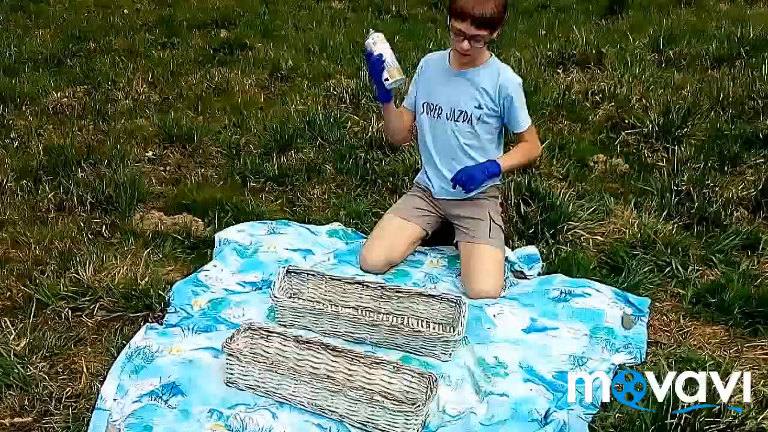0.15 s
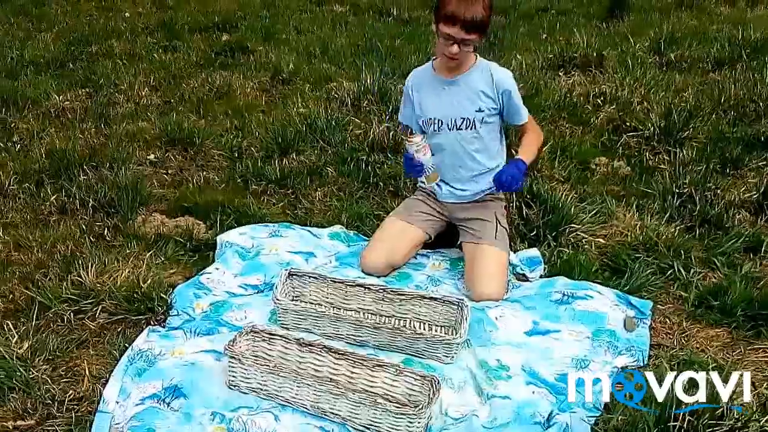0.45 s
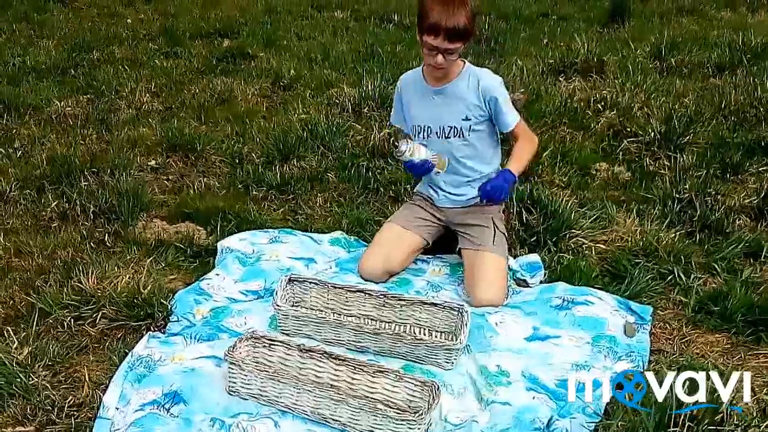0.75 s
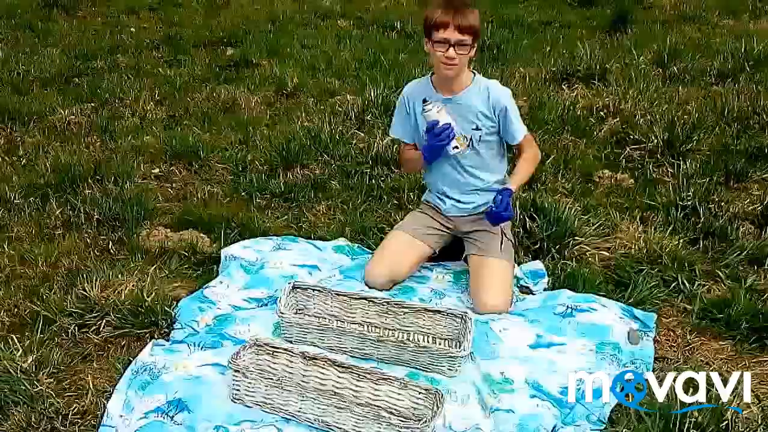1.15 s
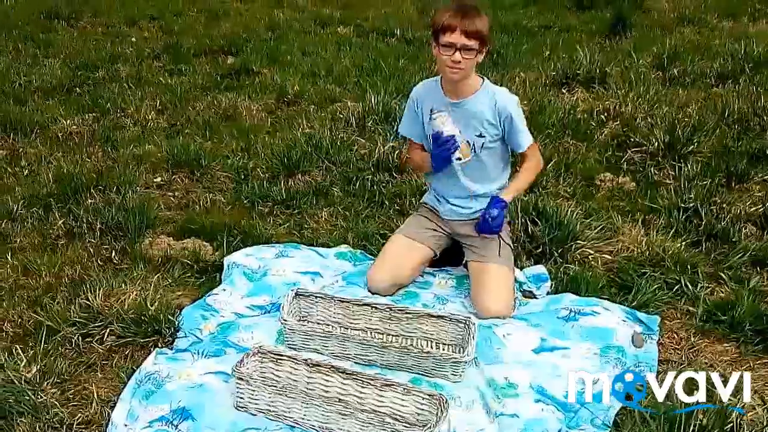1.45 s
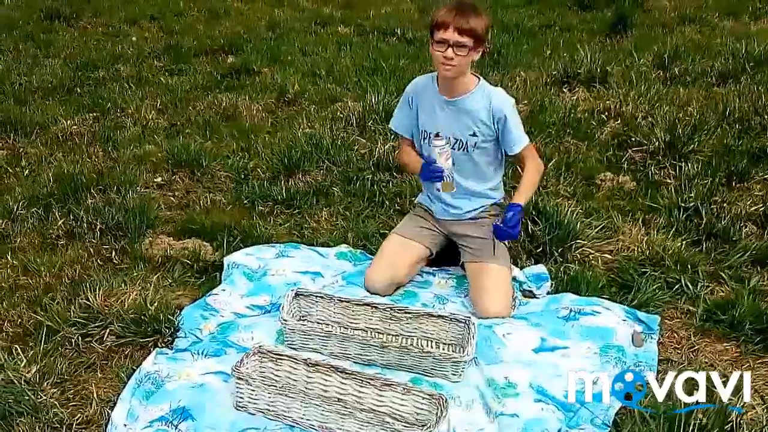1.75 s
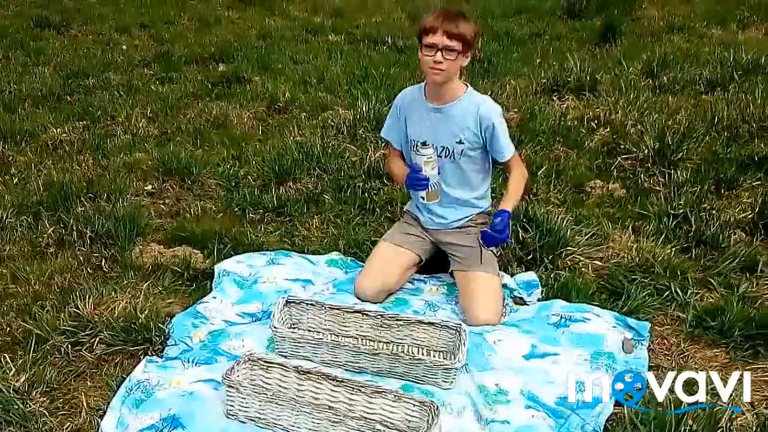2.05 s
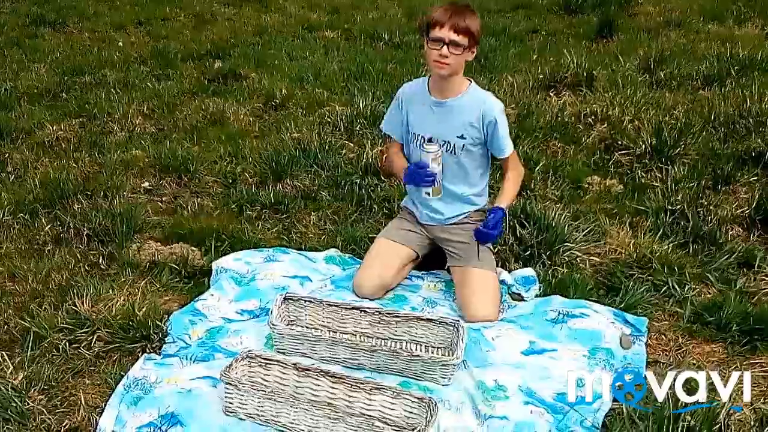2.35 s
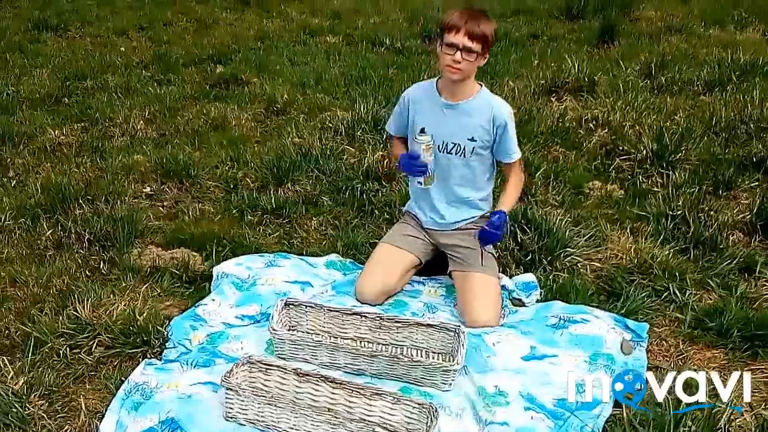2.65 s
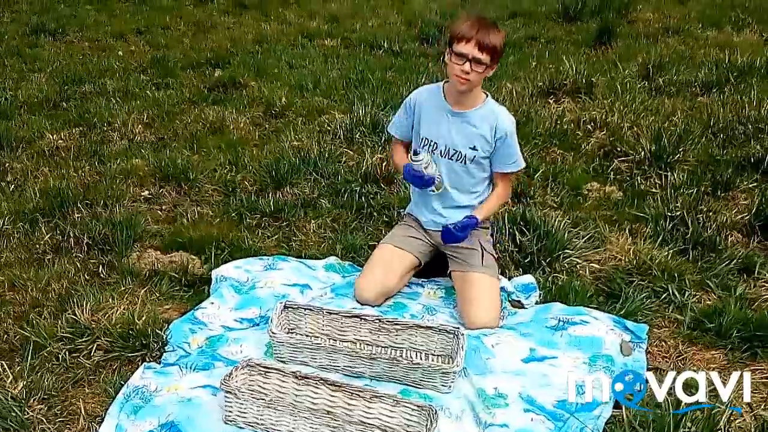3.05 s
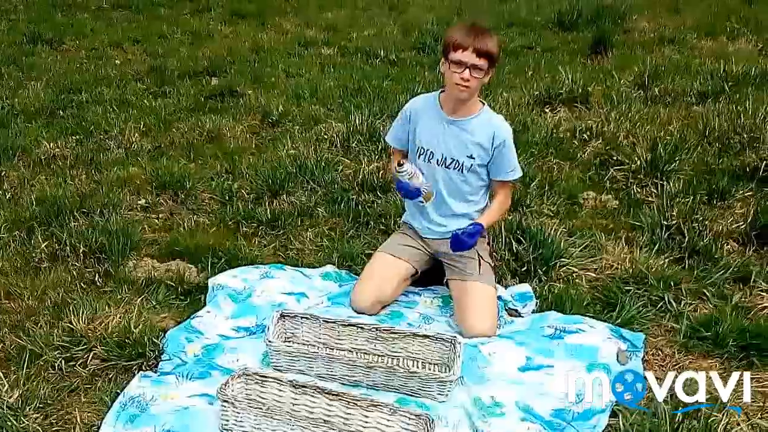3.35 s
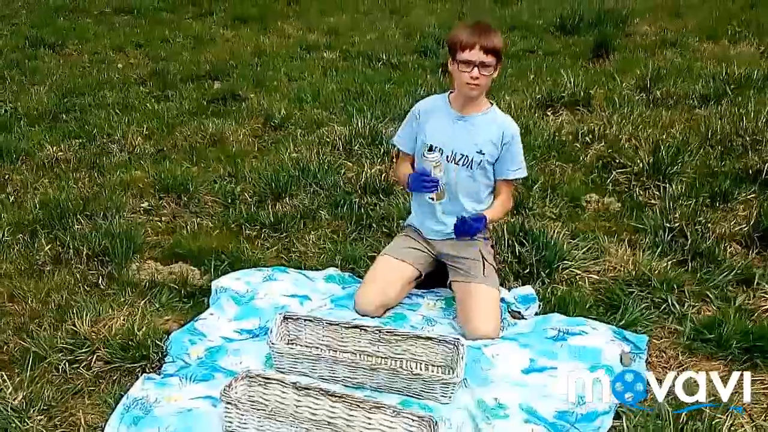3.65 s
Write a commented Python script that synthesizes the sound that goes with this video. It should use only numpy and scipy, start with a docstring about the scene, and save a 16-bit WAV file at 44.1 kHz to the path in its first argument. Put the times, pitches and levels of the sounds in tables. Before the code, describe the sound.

A spray can is shaken hard nearby, its mixing ball clacking brightly in an open meadow.

```python
"""Faint open-meadow air and the low note of a far-off bird come first, then a spray can is shaken hard close by.
The mixing ball's clacks are noise chatter shaped by the steel; its duller knocks are rings of damped modes.
It also skitters in runs of ticks and scrapes with a murmur; paint swishes as flickering noise.
Paint slaps the can's ends in soft dull thuds, very short sine pulses; the bird's two whistles glide and echo.
The microphone hears it all in mono, with the extreme top cut away."""
import sys
import numpy as np
from scipy import signal
from scipy.fft import rfft, irfft
from scipy.io import wavfile

SR = 44100
rng = np.random.default_rng(int(sys.argv[2]) if len(sys.argv) > 2 else 0)


def put_to_file(sound):
    """Save the sound as 16-bit audio at rate SR, in the file named by the first command-line argument."""
    columns = np.atleast_2d(sound).T  # one column per channel
    safe = np.clip(columns, -1, 1)
    whole_steps = np.round(safe * 32767)
    wavfile.write(sys.argv[1], SR, whole_steps.astype(np.int16))


N = 165375  # samples, 3.75 s

# Spectrum of the outdoor air: pitch_hz [Hz], level_db [relative dB per Hz]
AIR_SPECTRUM = [(25, -34), (60, -4), (100, 6), (160, -1.5), (350, -5.5), (1500, -6), (6000, -11),
                (9500, -26.5), (13500, -27.5), (15000, -20.5)]
# The bird's long low notes: start_s [s], level_db [peak dB before flutter and echo]
BIRD_LOW_NOTES = [(.05, -69.5), (.562, -62.5), (1.068, -64.5), (1.582, -63)]
# The bird's short high notes: start_s [s], level_db [peak dB before flutter and echo]
BIRD_HIGH_NOTES = [(.268, -52.5), (.762, -50), (1.272, -53)]
# Hiss of paint swishing on the wall: time_s [s], level_db [dB before flicker and echo]
SWISH_LEVEL = [(.1, -73), (1.3, -70.5), (1.7, -73), (3.75, -69.5)]
# Thuds of paint slapping the can's ends: start_s [s], level_db [peak dB before echo]
PAINT_THUDS = [(.176, -51.5), (0.67, -50.5), (0.681, -51), (.942, -48.5), (1.011, -50), (1.116, -46.5),
               (1.413, -43), (1.477, -49.5), (3.34, -47)]
# Hollow murmur of the ball circling in the paint: time_s [s], level_db [dB before flicker]
MURMUR_LEVEL = [(1.35, -86), (1.7, -84), (2.45, -76), (3.1, -67), (3.75, -76)]
# Runs of the ball skidding or skittering along the wall, levels before the tick and scrape offsets:
# start_s [s], length_s [s], clack_db [dB], knock_db [dB]
BALL_RUNS = [(0.212, 0.039, -52, -77), (0.398, 0.042, -45.5, -59.5), (.495, 0.042, -54, -60.5),
             (0.543, 0.026, -49.5, -49), (1.319, 0.021, -46.5, -49.5), (1.465, 0.062, -67, -57),
             (1.658, 0.17, -61, -57), (1.952, 0.059, -58, -52), (2.036, 0.093, -57.5, -59),
             (2.252, 0.028, -50.5, -48), (2.528, 0.057, -58.5, -53), (2.818, 0.078, -54.5, -53),
             (3.097, 0.063, -57, -58), (3.213, 0.073, -61.5, -69), (3.398, 0.047, -54, -55),
             (3.583, 0.043, -60, -57.5)]
# Spectrum of the steel wall's clack: pitch_hz [Hz], level_db [relative dB per Hz]
CLACK_SPECTRUM = [(1000, -29), (2000, -29), (2900, -7.5), (3800, -2), (4700, 3), (5700, 0.5), (6800, -7.5),
                  (7900, -13.5), (10500, -24.5), (13500, -27), (14800, -15), (16000, -37)]
# Modes of the filled can before the paint retunes all but the last:
# pitch_hz [Hz], level_db [relative dB], t60_s [s]
CAN_MODES = [(636, -13.5, 0.021), (863, -9.5, 0.015), (1084, -10.5, 0.015), (1552, 0.5, 0.018),
             (2582, 6.5, 0.0084)]
# Blows of the ball: start_s [s], clack_db [dB], knock_db [dB], tilt_db [dB per octave],
# chatter_share [0-1, share of the clack's energy in its after-chatter, limited in contact()]
BALL_BLOWS = [(0.1845, -43, -59, 8.5, 0.76), (0.2, -39.5, -69, -0.5, 0.85), (0.225, -46, -56, 1.5, 0),
              (0.3888, -35.5, -53.5, 4, 0.4), (0.401, -40.5, -52.5, 11, 0.1), (0.412, -41, -61, 10, 0.5),
              (0.4326, -40, -50, 0.5, 1), (0.467, -39.5, -55, 3, 0.17), (0.4867, -36, -51.5, -1.5, 0.3),
              (0.492, -43, -68, -2, 0), (0.5048, -36.5, -47.5, 4.5, 1), (0.5149, -38.5, -66, -2, 0.2),
              (0.525, -33.5, -68, -3, 0.76), (0.5917, -26.5, -38, -1, 0.7), (0.6272, -44, -54.5, -1.5, 0.1),
              (0.7743, -31.5, -46.5, 4, 0.35), (0.7926, -29, -48.5, 2.5, 0.7),
              (0.8186, -37.5, -48.5, -0.5, 0.9), (0.833, -45, -83, 5, 0.4), (0.9205, -29.5, -38.5, 2, 0.27),
              (0.9312, -34.5, -44, 1.5, 0.35), (1.0336, -29.5, -51, 1, 1), (1.0405, -26.5, -66, -1.5, 0.3),
              (1.0493, -44, -65, 3, 0.4), (1.0603, -36.5, -53, -1.5, 0.13),
              (1.0683, -29.5, -54, -0.5, 0.47), (1.1057, -47.5, -71, 0.5, 0.1), (1.1899, -36, -42, 6, 0.9),
              (1.2032, -32, -56, -1, 0.9), (1.3331, -27, -56, -2, 0.64), (1.361, -34.5, -49, 3, 0.35),
              (1.4515, -32.5, -51.5, 1.5, 0.8), (1.4892, -36.5, -48.5, 0, 0.52), (1.633, -27, -42, 1, 1),
              (1.6449, -43, -82, -2, 0.15), (1.6572, -41, -53, 6, 0.03), (1.7303, -31, -40, 2, 0.9),
              (1.7713, -42, -50, 0.5, 1), (1.9093, -33.5, -46.5, 3.5, 0.9), (1.919, -38.5, -54, 8, 0.9),
              (1.935, -41.5, -47, 2, 0.41), (2.018, -35.5, -41.5, 4, 0), (2.0208, -33.5, -51, 3.5, 0.63),
              (2.2161, -36, -56, 1.5, 0.34), (2.2226, -40.5, -51, 16, 0.9), (2.296, -31.5, -42.5, 5, 0.28),
              (2.3129, -35, -44, -2, 0.5), (2.4608, -30, -65, -1, 0.2), (2.4854, -34, -67, 2, 0.1),
              (2.5038, -40, -57, 3.5, 0.19), (2.5886, -32, -36.5, 5, 0.75), (2.6855, -46, -56, 1.5, 0.04),
              (2.797, -38.5, -44, 6.5, 0.2), (2.8164, -43.5, -56, 8, 0.4), (2.8858, -33.5, -46, 1.5, 0),
              (2.9315, -36.5, -45.5, -4.5, 0.8), (3.0589, -34.5, -47.5, 8.5, 1),
              (3.079, -39.5, -48, 14, 0.4), (3.0967, -39, -56, 1.5, 0.1), (3.1775, -31.5, -40, 4, 0.07),
              (3.186, -33.5, -39.5, 2, 0.94), (3.341, -28.5, -41, 5.5, 0.5), (3.3756, -36.5, -56, -7, 0.5),
              (3.3846, -40, -51, 3.5, 0.4), (3.3908, -41.5, -80, 3, 0.71),
              (3.4615, -33.5, -41.5, 3.5, 0.76), (3.488, -29, -44, 0.5, 0.37)]
# Knocks of the ball through the paint: start_s [s], level_db [dB], pitch_hz [Hz, hollow ring]
PAINT_KNOCKS = [(0.5398, -43.5, 1540), (0.8544, -42.5, 1370), (0.867, -42.5, 1455), (1.0005, -46.5, 1230),
                (1.1412, -40, 1620), (1.1579, -38.5, 1650), (1.193, -41, 1350), (1.2044, -39, 1660),
                (1.3998, -45.5, 1690), (1.423, -46.5, 1750), (1.4427, -46.5, 1428), (1.452, -37, 1480),
                (2.546, -47, 1550), (2.618, -49.5, 1430), (2.6391, -46, 1440), (3.2065, -50, 1430),
                (3.2353, -42, 1507), (3.4213, -48.5, 1500)]

HIT_SIZE, LEVEL_SIZE = 2048, 220  # samples: one hit (46 ms); level window and flicker step (5 ms)
AIR_DB, CUTOFF_HZ = -65, 16500

# each note: pitch_hz, length_s, slide_s, warble_hz (depth)
LOW_SHAPE, HIGH_SHAPE = (3175, 0.2, 0.02, 8.2), (4555, 0.068, 0.0083, 58)
SLIDE_HZ, WARBLE_PER_S, BIRD_FLUTTER_DB = 458, 32.4, 4  # height of the opening slide; rate; unevenness
BIRD_ECHO_DB, BIRD_ECHO_T60_S = -1, 0.47
GROUND_ECHO_DB, GROUND_ECHO_T60_S = -17, 0.039

THUD_HZ, THUD_SWELL_S, THUD_DRIFT = 334, 0.00074, 0.017  # drift: share of the pitch per swell time
SWISH_GRAIN_DB, SCRAPE_GRAIN_DB = 4, 4  # unevenness from moment to moment

TICKS_PER_S, TICK_SPREAD_DB = 190, 5
TICK_DB, SCRAPE_DB = -5.5, -9.5  # against the level of the run
STRAY_PER_S, STRAY_DB, STRAY_SPAN_S = 45, -59, (1.5, 3.65)  # lone light touches

PAINT_DETUNE, MODE_SPREAD_DB = 0.11, 3.24  # the sloshing paint retunes the can from blow to blow
KNOCK_LOW_HZ = 520  # the small can radiates little below this
CLACK_CHATTER_S, KNOCK_CHATTER_S = 0.0013, 0.0011  # decay times
KNOCK_CHATTER, CUSHIONED_CHATTER = 0.56, 0.15  # energy share of chatter; the same cushioned by paint
BARE_HOLLOW_DB = -1  # a bare blow leaves the hollow modes slightly weaker
HOLLOW_DB, KNOCK_CLACK_DB = 7.5, -4  # a cushioned touch favours the hollow modes; the clack left in it


def from_db(db):
    """Decibels to gain."""
    return 10 ** (np.asarray(db) / 20)


def unit(x):
    """Scale to energy 1."""
    return x / np.sqrt(np.sum(x ** 2) + 1e-20)


def level_at(curve, s):
    """Read a level curve at the given times."""
    return np.interp(s, *np.transpose(curve))


def add(out, s, sound):
    """Mix a sound in at time s."""
    i = max(int(s * SR), 0)
    out[i:i + len(sound)] += sound[:max(N - i, 0)]


def response(points, tilt_db=0):
    """Causal impulse response with the given spectrum, tilted in dB per octave."""
    hz, db = np.transpose(points)
    f = np.fft.rfftfreq(HIT_SIZE, 1 / SR) + 1
    level_db = np.interp(np.log(f), np.log(hz), db)
    level_db += tilt_db * np.log2(np.clip(f, hz[0], hz[-1]))
    # folding the cepstrum gives minimum phase: the energy comes as early as it can
    cepstrum = irfft(np.log(from_db(level_db)))
    cepstrum[1:HIT_SIZE // 2] *= 2
    cepstrum[HIT_SIZE // 2 + 1:] = 0
    return unit(irfft(np.exp(rfft(cepstrum))))


def hiss(body):
    """Steady noise through a body; rms 1."""
    return signal.fftconvolve(rng.standard_normal(N + HIT_SIZE - 1), body, "valid")


def uneven(spread_db):
    """A random gain that flickers every few milliseconds."""
    grain = rng.standard_normal(N // LEVEL_SIZE + 2)
    grain = np.interp(np.arange(N) / LEVEL_SIZE, np.arange(len(grain)), grain)
    return from_db(spread_db * grain)


def outdoors(x, echo_db, t60):
    """Direct sound plus a diffuse, dying noise tail scattered by the surroundings."""
    t = np.arange(SR) / SR
    decay = np.exp(-np.log(1000) * t / t60)
    onset = 1 - np.exp(-t / 0.00069)
    tail = unit(rng.standard_normal(SR) * decay * onset)
    return x + from_db(echo_db) * signal.fftconvolve(x, tail)[:N]


def open_air():
    """Faint, steady air over the meadow: noise with a fixed spectrum."""
    return from_db(AIR_DB) * hiss(response(AIR_SPECTRUM))


def bird():
    """Far off, long low and short high whistles in turn slide down onto pitch, warbling and echoing."""
    out = np.zeros(N)
    for notes, shape in (BIRD_LOW_NOTES, LOW_SHAPE), (BIRD_HIGH_NOTES, HIGH_SHAPE):
        hz, length, slide_s, warble_hz = shape
        t = np.arange(int(length * SR)) / SR
        slide = SLIDE_HZ * np.exp(-t / slide_s)
        warble = warble_hz * np.cos(2 * np.pi * WARBLE_PER_S * t)
        phase = 2 * np.pi * np.cumsum(hz + slide + warble) / SR
        swell = np.sqrt(np.sin(np.pi * np.sqrt(t / length)))
        for s, db in notes:
            add(out, s, from_db(db) * swell * np.sin(phase))
    return outdoors(out * uneven(BIRD_FLUTTER_DB), BIRD_ECHO_DB, BIRD_ECHO_T60_S)


def paint():
    """The liquid swishes along the wall as noise and slaps the can's ends in soft dull thuds."""
    swish_gain = from_db(level_at(SWISH_LEVEL, np.arange(N) / SR))
    out = swish_gain * uneven(SWISH_GRAIN_DB) * hiss(response(CLACK_SPECTRUM))
    age = np.arange(HIT_SIZE) / SR / THUD_SWELL_S
    pitch = THUD_HZ * (1 + THUD_DRIFT * (age - 1))
    thud = age * np.exp(1 - age) * np.sin(2 * np.pi * np.cumsum(pitch) / SR)
    for s, db in PAINT_THUDS:
        add(out, s, from_db(db) * thud)
    return out


def contact(body, decay_s, share):
    """One sharp touch, then dense dying chatter, both through a body; rms 1 over 5 ms."""
    t = np.arange(HIT_SIZE) / SR
    share = np.clip(share, .02, .95)
    onset = 1 - np.exp(-(t / 0.00055) ** 2)
    chatter = rng.standard_normal(HIT_SIZE) * np.exp(-t / decay_s) * onset
    after = unit(signal.fftconvolve(chatter, body)[:HIT_SIZE])
    touch = np.sqrt(1 - share) * unit(body) + np.sqrt(share) * after
    return unit(touch) * np.sqrt(LEVEL_SIZE)


def modes(pitch_hz, hollow_db):
    """Ring of the can: a fixed top mode of the wall, and hollow modes that the paint retunes together."""
    t = np.arange(HIT_SIZE) / SR
    hz, db, t60 = np.transpose(CAN_MODES)[:, :, None].copy()
    hz[:-1] *= pitch_hz / hz[-2]
    db[:-1] += hollow_db
    gain = from_db(db + MODE_SPREAD_DB * rng.standard_normal(hz.shape))
    gain[::2] *= -1  # alternate modes start in opposite directions
    decay = np.exp(-np.log(1000) * t / t60)
    ring = np.sum(gain * decay * np.sin(2 * np.pi * hz * t), axis=0)
    low_cut = signal.butter(4, KNOCK_LOW_HZ, "high", fs=SR, output="sos")
    return unit(signal.sosfilt(low_cut, ring))


def sloshed_pitch():
    """Pitch of the hollow ring in Hz, wherever the paint happens to lie."""
    return CAN_MODES[-2][0] * np.exp(PAINT_DETUNE * rng.uniform(-1.31, 1))


def scraping():
    """The ball stays on the wall: grit from the steel and a hollow murmur of wandering pitch."""
    t = np.arange(N) / SR
    grit_gain = np.zeros(N)
    murmur_gain = from_db(level_at(MURMUR_LEVEL, t))
    for start, length, clack_db, knock_db in BALL_RUNS:
        run = from_db(SCRAPE_DB) * signal.windows.tukey(int(length * SR))
        add(grit_gain, start, from_db(clack_db) * run)
        add(murmur_gain, start, from_db(knock_db) * run)
    # overlapping noise grains, each through a newly tuned can
    hollow = np.zeros(N)
    fade = np.sqrt(np.hanning(HIT_SIZE))
    for i in range(0, N, HIT_SIZE // 2):
        grain = fade * rng.standard_normal(HIT_SIZE)
        add(hollow, i / SR, signal.fftconvolve(grain, modes(sloshed_pitch(), HOLLOW_DB)))
    grit = grit_gain * hiss(response(CLACK_SPECTRUM))
    return uneven(SCRAPE_GRAIN_DB) * (grit + murmur_gain * hollow)


def knock(clack_db, knock_db, pitch_hz):
    """A touch cushioned by paint: a compact hollow ring with a clack of the steel."""
    clack = contact(response(CLACK_SPECTRUM), CLACK_CHATTER_S, KNOCK_CHATTER)
    ring = contact(modes(pitch_hz, HOLLOW_DB), KNOCK_CHATTER_S, CUSHIONED_CHATTER)
    return from_db(clack_db) * clack + from_db(knock_db) * ring


def tick(clack_db, knock_db):
    """A light touch of the ball, of random strength."""
    db = TICK_SPREAD_DB * np.clip(rng.standard_normal(2), -2, 2)
    return knock(clack_db + db[0], knock_db + db[1], sloshed_pitch())


def rolling():
    """The ball skitters in quick runs of ticks; lone touches are strewn over the later shaking."""
    out = np.zeros(N)
    for start, length, clack_db, knock_db in BALL_RUNS:
        for s in np.arange(start, start + length, 1 / TICKS_PER_S):
            jitter_s = rng.uniform(-.5, 0.54) / TICKS_PER_S
            add(out, s + jitter_s, tick(clack_db + TICK_DB, knock_db + TICK_DB))
    for s in np.arange(*STRAY_SPAN_S, 1 / STRAY_PER_S):
        add(out, s + rng.random() / STRAY_PER_S, tick(STRAY_DB, STRAY_DB))
    return out


def blow(clack_db, knock_db, tilt_db, share):
    """The ball meets the can: a bright clack of steel and a short ring of the paint-damped modes."""
    clack = contact(response(CLACK_SPECTRUM, tilt_db), CLACK_CHATTER_S, share)
    ring = contact(modes(sloshed_pitch(), BARE_HOLLOW_DB), KNOCK_CHATTER_S, KNOCK_CHATTER)
    return from_db(clack_db) * clack + from_db(knock_db) * ring


def ball():
    """Blows and bounces; hollow knocks through the paint, between blows or together with them."""
    out = np.zeros(N)
    for s, clack_db, knock_db, tilt_db, share in BALL_BLOWS:
        add(out, s, blow(clack_db, knock_db, tilt_db, share))
    for s, db, hz in PAINT_KNOCKS:
        add(out, s, knock(db + KNOCK_CLACK_DB, db, hz))
    return out


def scene():
    """The open air and distant bird behind the can; blows and paint carry a short ground echo."""
    meadow = open_air() + bird()
    shaken = outdoors(ball() + paint(), GROUND_ECHO_DB, GROUND_ECHO_T60_S)
    can = shaken + rolling() + scraping()
    return (meadow + can)[None]  # one channel


def record(dry):
    """What the microphone delivers: the top is cut steeply by an elliptic low-pass."""
    top_cut = signal.ellip(10, .3, 70, CUTOFF_HZ, fs=SR, output="sos")
    return signal.sosfilt(top_cut, dry)


dry = scene()
out = record(dry)
put_to_file(out)
```